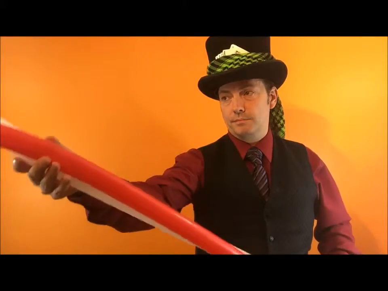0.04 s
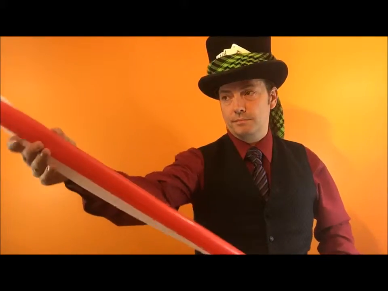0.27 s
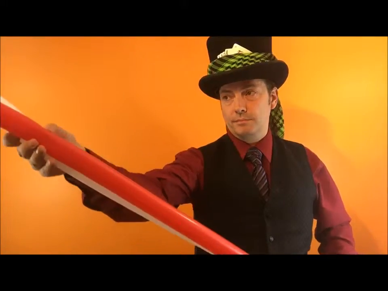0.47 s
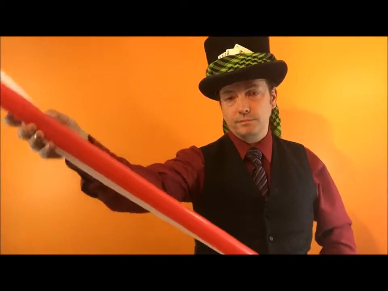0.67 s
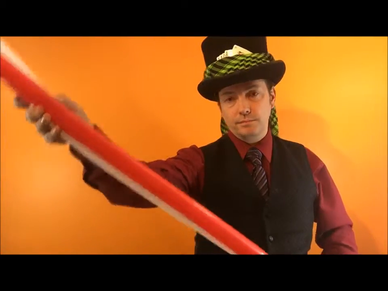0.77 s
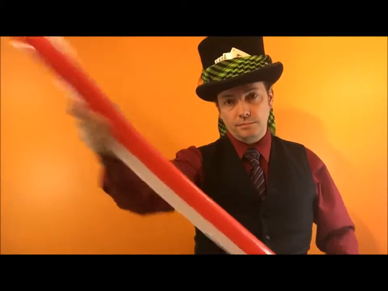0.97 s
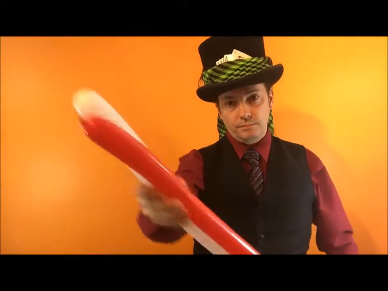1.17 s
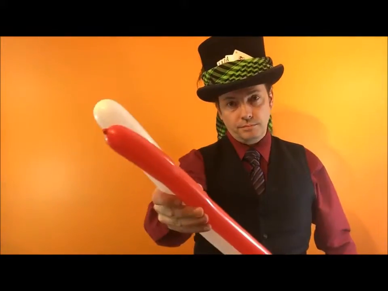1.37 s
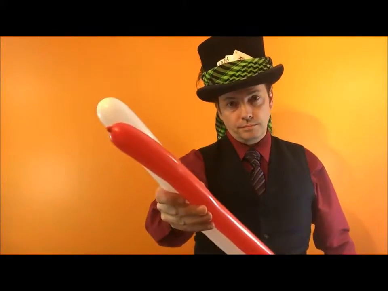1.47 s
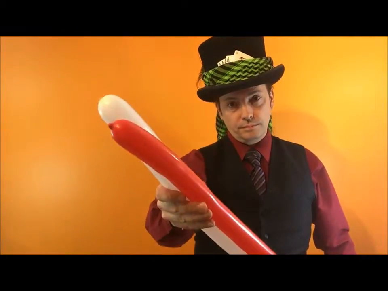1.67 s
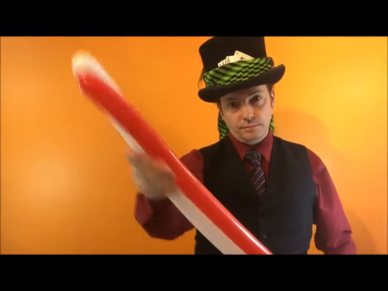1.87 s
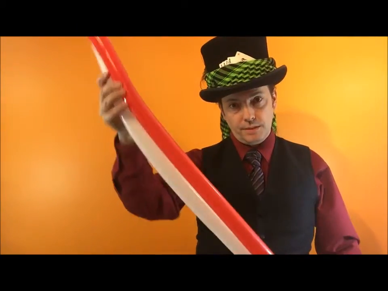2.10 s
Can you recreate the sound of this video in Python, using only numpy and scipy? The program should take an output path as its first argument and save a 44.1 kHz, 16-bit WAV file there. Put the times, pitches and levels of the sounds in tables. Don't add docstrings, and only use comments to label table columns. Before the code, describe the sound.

Hand rubbing inflated latex balloons, scratchy squeaks and creaks, then a pause and faint crackles

```python
import sys
import numpy as np
from scipy import signal
from scipy.fft import rfft, irfft, next_fast_len
from scipy.io import wavfile
from scipy.ndimage import map_coordinates

SR = 44100
rng = np.random.default_rng(int(sys.argv[2]) if len(sys.argv) > 2 else 0)


def put_to_file(sound):
    columns = np.atleast_2d(sound).T
    safe = np.clip(columns, -1, 1)
    whole_steps = np.round(safe * 32767)
    wavfile.write(sys.argv[1], SR, whole_steps.astype(np.int16))


def to_linear_factor(level_db):
    exponent = np.asarray(level_db, float) / 20
    return 10 ** exponent


N = 94329


def unit(x):
    return x / np.sqrt(np.mean(x ** 2) + 1e-20)


def along(points, hz):
    f, v = np.transpose(points)
    return np.interp(np.log(hz + 1), np.log(f + 1), v)


def curves(rows):
    s, *columns = np.transpose(rows)
    return [np.interp(np.arange(N) / SR, s, column) for column in columns]


def wobble(rate):
    knots = rng.standard_normal(int(N * rate / SR) + 4)
    return map_coordinates(knots, [np.arange(N) * rate / SR])


def coloured(x, points):
    size = 2 ** 12
    level_db = np.maximum(along(points, np.fft.rfftfreq(size, 1 / SR)), -70)
    cepstrum = irfft(np.log(to_linear_factor(level_db)), size)
    cepstrum[1:size // 2] *= 2
    cepstrum[size // 2 + 1:] = 0
    response = irfft(np.exp(rfft(cepstrum)), size)
    return signal.fftconvolve(x, response)[:len(x)]


def narrow(x, hz, width_hz):
    return unit(signal.lfilter(*signal.iirpeak(hz, hz / width_hz, SR), x))


def ringing(x, hz, ring_db, overtone_db):
    rise_s, width, overtone = 0.00025, 0.3, 1.458
    t = np.arange(SR // 100) / SR
    envelope = (1 - np.exp(-(t / rise_s) ** 2)) * np.exp(-np.pi * width * hz * t)
    modes = np.sin(2 * np.pi * hz * t) + to_linear_factor(overtone_db) * np.sin(2 * np.pi * overtone * hz * t)
    ring = envelope * modes
    ring = ring / np.abs(rfft(ring)).max()
    return x + to_linear_factor(ring_db) * signal.fftconvolve(x, ring)[:len(x)]


# (frequency [Hz], level [dB])
SKIN_COLOUR = [(400, -30.5), (750, -8.5), (1100, -0.5), (1450, -3.5), (1950, 0), (3600, -1.5), (4500, -5),
               (6500, -64.5)]


def skin_sound(x):
    return coloured(x, SKIN_COLOUR)


# (frequency [Hz], level [dB])
TICK_COLOUR = [(3500, -17.5), (5300, -0.5), (7000, -2.5), (10300, -13.5), (11500, -7.5), (15200, -12),
               (15900, -55), (16700, -67)]


def bright_edge(x):
    return coloured(x, TICK_COLOUR)


def notes(rows, shape):
    out = np.zeros(N + SR)
    t = np.arange(-SR // 25, SR // 25) / SR
    for s, db, hz in rows:
        out[round(s * SR):][:len(t)] += to_linear_factor(db) * shape(t, hz) * np.cos(2 * np.pi * hz * t)
    return out[len(t) // 2:][:N]


# (frequency [Hz], level [dB])
AIR_COLOUR = [(30, -27), (120, -2.5), (400, -8.5), (700, -8.5), (2000, -14.5), (8000, -23.5), (15300, -28),
              (16000, -31)]


def air():
    air_db, hum_db, hum_hz = -71.5, -81, 123.7
    noise = unit(coloured(rng.standard_normal(N), AIR_COLOUR))
    tone = np.sqrt(2) * np.sin(2 * np.pi * hum_hz * np.arange(N) / SR)
    return to_linear_factor(air_db) * noise + to_linear_factor(hum_db + 1.7 * wobble(8.6)) * tone


# (time [s], pressure level [dB], brightness [dB])
RUB = [(.028, -57.5, -0.5), (.04, -48.5, 1.5), (.15, -53, 5.5), (.18, -42, 8), (.45, -39, -1),
       (.53, -47, 1), (.62, -43.5, -4.5), (.765, -52.5, -3.5), (.8, -44, -16), (.86, -60.5, 9.5),
       (.89, -63, 3.5), (1.03, -64.5, 7.5), (1.06, -60.5, 5.5), (1.15, -46.5, 5), (1.27, -71.5, 7),
       (1.87, -81, 14.5), (2.02, -64, 3), (2.09, -61, 7)]
PATCH_HZ = [1190, 1950, 2500, 3600]
# (pitch [Hz], width [Hz], level [dB])
TUBE = [(620, 19, -10.5), (985, 44, -7.5)]
# (time [s], level [dB])
TUBE_OPEN = [
    (.5, -8),
    (.6, -11.5),
    (.73, -11),
    (.78, -7),
    (1.0, -18),
    (1.1, -11),
]


def rub():
    grains_per_s, biggest, grain_db = 1400, 0.14, 5
    smooth_db, patch_sway_db, tube_sway_db, flutter_db = -2, 2.5, 2, 1
    fizz_db = -14
    pressure_db, bright_db = curves(RUB)

    hit, size, sign = rng.random((3, len(PATCH_HZ), N))
    happens = hit < grains_per_s / SR / len(PATCH_HZ)
    grains = happens * to_linear_factor(-grain_db * np.log(size + biggest)) * (sign - 0.5)
    drive = unit(grains) + to_linear_factor(smooth_db) * rng.standard_normal(grains.shape)
    whole_hand = drive.sum(axis=0)

    skin = sum(to_linear_factor(patch_sway_db * wobble(29.68)) * ringing(d, hz, ring_db=12, overtone_db=-4)
               for d, hz in zip(drive, PATCH_HZ))
    tube = sum(to_linear_factor(db + tube_sway_db * wobble(12.03)) * narrow(whole_hand, hz, width_hz)
               for hz, width_hz, db in TUBE)
    tube = to_linear_factor(curves(TUBE_OPEN)[0]) * tube
    fizz = unit(bright_edge(whole_hand)) * to_linear_factor(fizz_db + bright_db)
    return to_linear_factor(pressure_db + flutter_db * wobble(41.14)) * (unit(skin_sound(skin)) + tube + fizz)


# (time [s], level [dB])
THUD = [(.03, -65), (.11, -56), (.15, -55.5), (.3, -46.5), (.4, -52.5), (.445, -51), (.47, -60), (.6, -68),
        (.65, -69), (.93, -68), (.97, -63), (1.03, -76), (1.14, -51), (1.22, -78.5), (1.95, -72),
        (2.12, -60.5)]
# (frequency [Hz], level [dB])
THUD_COLOUR = [(15, -60), (25, -77), (65, -11.5), (291, -4), (344, -11), (390, -5.5), (700, -7.5),
               (910, -31), (1540, -120)]
# (pitch [Hz], width [Hz], level [dB])
BOOMS = [(75, 38, -4.5), (340.5, 8.6, -7.5)]


def thud():
    lump_db = 1.2
    level_db, = curves(THUD)
    booms = sum(to_linear_factor(db) * narrow(rng.standard_normal(N), hz, width_hz) for hz, width_hz, db in BOOMS)
    rumble = unit(coloured(rng.standard_normal(N), THUD_COLOUR))
    return unit((rumble + booms) * to_linear_factor(lump_db * wobble(25.64))) * to_linear_factor(level_db)


# (peak time [s], peak level [dB], pitch [Hz])
PINGS = [(.0538, -34.5, 2000), (.0818, -39.5, 1160), (.0885, -29, 2000), (.0956, -30, 1810),
         (.1081, -35, 2000), (.1138, -24.5, 2050), (.1659, -38, 2040), (.1722, -27, 1440),
         (.1838, -29, 2620), (.1895, -23, 2980), (.2108, -43, 1340), (.2492, -22, 1090), (.269, -20, 2100),
         (.2956, -23.5, 2480), (.3019, -28.5, 1370), (.3043, -26, 1970), (.3076, -17, 2080),
         (.328, -22.5, 3650), (.337, -34, 2280), (.3659, -17, 2980), (.368, -25.5, 1360),
         (.3757, -32, 2410), (.4256, -23, 3630), (.4314, -29, 1970), (.4342, -27, 1700), (.5002, -32, 1230),
         (.5105, -25.5, 4200), (.5768, -17, 2650), (.5772, -21, 3630), (.5795, -22, 2300),
         (.5856, -27, 1990), (.582, -30.5, 1020), (.9488, -29.5, 2800), (.9495, -31.5, 1190),
         (1.0633, -29.5, 2630), (1.0729, -42, 2670), (1.116, -33.5, 1190), (1.1246, -31.5, 1920),
         (1.1335, -29, 1080), (1.4775, -40, 2950), (1.4795, -47, 980), (1.7262, -52, 3300),
         (1.8957, -51, 1430), (1.8993, -49, 1650), (1.9122, -45, 1570), (1.9198, -43, 1160),
         (1.9395, -45, 1430), (1.9487, -44.5, 1120), (2.0724, -44, 1630), (2.1015, -43, 1190),
         (2.128, -43, 1470), (2.0906, -41.5, 1510), (2.0874, -46, 1530)]


def pings():
    rise_s, cycles = 0.00033, 1.7

    def shape(t, hz):
        rise = np.exp(-(t / rise_s) ** 2 / 2)
        fall = np.exp(-np.abs(t) * hz / cycles)
        return np.where(t < 0, rise, fall)

    return notes(PINGS, shape)


# (middle time [s], peak level [dB], pitch [Hz])
THUMPS = [(.117, -47, 197), (.139, -48, 88), (.177, -44.5, 360), (.187, -46.5, 84), (.209, -52, 176),
          (.261, -41.5, 343), (.263, -61, 88), (.255, -51, 620), (.301, -42.5, 630), (.308, -46, 204),
          (.316, -43, 79), (.345, -38.5, 69.6), (.349, -41.5, 150), (.381, -46.5, 157), (.427, -53.5, 600),
          (.441, -54, 350), (.445, -39, 78), (.598, -56.5, 80), (.605, -44, 970), (.64, -65, 985),
          (.672, -52, 980), (.712, -58, 920), (.803, -60, 990), (.683, -51.5, 600), (.713, -51, 628),
          (.954, -52, 613), (1.091, -57, 75), (1.137, -47.5, 233), (1.145, -49, 68)]


def thumps():
    length_s = 0.027
    return notes(THUMPS, lambda t, hz: np.cos(np.pi * np.clip(t / length_s, -0.5, 0.5)) ** 2)


def slip(hz, after_db, ring_db):
    lead_s, lead_db = 0.002, -16
    after_t60_s, spread, overtone_db = 0.028, 0.35, -6
    tick_t60_s, tick_after_db = 0.0045, -3
    tick_hz, edge_hz = 5100, 8300
    t = np.arange(SR // 12) / SR - lead_s
    start = np.argmax(t >= 0)
    train = np.zeros(len(t))
    train[[0, start]] = to_linear_factor(lead_db), 1
    skin = ringing(train, hz, ring_db, overtone_db)

    for late, size, pitch in rng.random((12, 3)):
        after = np.zeros(len(t))
        late_s = late ** 1.5 * after_t60_s / 2 + 0.001143
        fade_db = -60 * late_s / after_t60_s / 2
        after[start + int(late_s * SR)] = (2 * size - 1) * to_linear_factor(after_db + fade_db)
        after_hz = min(hz * np.exp(spread * (2 * pitch - 1.3)), SR / 4)
        skin += ringing(after, after_hz, ring_db, overtone_db)
        train += to_linear_factor(tick_after_db) * after

    fade = to_linear_factor(-60 * np.arange(SR // 100) / SR / tick_t60_s)
    spit = np.convolve(train, rng.standard_normal(SR // 100) * fade)[:len(t)]
    tick = bright_edge(spit)
    low = signal.lfilter(*signal.butter(3, [tick_hz, edge_hz], "band", fs=SR), tick)
    high = signal.lfilter(*signal.butter(4, edge_hz, "high", fs=SR), tick)
    return [v / np.abs(v).max() for v in (skin_sound(skin), low, high)], start


# (time [s], peak level [dB], skin pitch [Hz], tick level [dB],
# thin top tick level [dB]) The main slips of the strokes, mostly strong, a few of them higher-pitched
SLIPS = [(0.1135, -22, 1810, -16.5, -20.5), (0.1647, -25, 2830, -32, -23), (0.1711, -27, 2600, -13, -25),
         (0.1814, -22.5, 2600, -18.5, -29), (0.1893, -21, 1950, -36, -18.5),
         (0.2088, -21, 1850, -42, -18.5), (0.2471, -18, 1920, -32, -29), (0.2657, -19.5, 1870, -19, -18),
         (0.2982, -18.5, 1840, -15, -12.5), (0.3253, -19, 2290, -19, -19.5),
         (0.3639, -21.5, 2130, -11, -13), (0.4067, -38, 2100, -18, -33), (0.4234, -20.5, 2700, -25, -24),
         (0.4888, -28.5, 1940, -15, -23), (0.5765, -18.5, 2050, -18, -23.5), (0.9266, -47, 2090, -20, -31),
         (0.9485, -28, 1840, -19, -44), (1.1144, -26, 2670, -8, -23), (1.1314, -27, 2640, -9, -18),
         (0.4831, -29, 2470, -21, -31),
    (0.5087, -24.5, 2380, -11.5, -16),
    (0.834, -31.5, 3330, -31, -25),
    (1.062, -25.5, 3500, -26.5, -32),
]
CREAKS = [(1.281, -51, 1860, -27, -21), (1.345, -51, 2050, -26, -22), (1.406, -48.5, 1850, -33, -13),
          (1.424, -46.5, 1600, -14.5, -20), (1.449, -47.5, 1930, -23, -15), (1.476, -38, 2100, -44, -20),
          (1.497, -51, 1970, -20, -22), (1.606, -52, 2010, -33, -17), (1.725, -49.5, 2100, -21, -18),
          (2.041, -45, 1800, -32, -14.5), (2.054, -47, 1530, -37, -31), (2.07, -51.5, 1630, -12, -11),
          (2.078, -47, 3920, -35, -8), (2.088, -38, 1600, -40, -18), (2.1, -39.5, 3600, -28, -16),
          (2.11, -52, 3140, -21, 0), (2.115, -38, 4460, -31, -15.5), (2.129, -42.5, 3950, -25, -26)]
SCRAPES = [
    (1.9084, -36.5, 1610, -28.5, -35),
    (1.918, -40, 1800, -22, -32),
    (1.936, -44.5, 1900, -21, -25),
    (1.9503, -41, 1430, -30, -23),
]
# (time [s], peak level [dB], skin pitch [Hz])
TICKS = [(0.6942, -36.5, 1950), (0.7049, -37, 2050), (0.7115, -38, 1730), (0.7246, -46, 1950),
         (0.7536, -37, 2320), (0.758, -37, 2000), (0.7618, -34, 2150), (0.7635, -38, 2120),
         (0.7681, -31, 2720), (0.7749, -33, 2820), (0.78, -38, 2600), (0.783, -34, 2240)]
# (start time [s], length [s], rate [slips/s], peak level [dB], skin pitch [Hz])
CHATTER = [
    (.79, .03, 370, -35, 2200),
    (.82, .046, 300, -40, 2000),
    (1.892, .014, 700, -54, 1300),
]


def slips():
    snap_s, tick_boost_db = 0.0007, 8
    dry_end = (-24, -34, -24, 6)  # tick, top tick, after-slips, ring [dB]
    rows = [(*row, -8, 13) for row in SLIPS]
    rows += [(*row, -2, 7) for row in CREAKS]
    rows += [(*row, 0, 26) for row in SCRAPES]
    rows += [(*row, *dry_end) for row in TICKS]
    for s, length, rate, db, hz in CHATTER:
        for k, (jitter, gain_db, pitch) in enumerate(rng.standard_normal((50, 3))):
            when = s + (k + 0.13 * jitter) / rate
            if when < s + length:
                rows.append((when, db + gain_db, hz * np.exp(0.19 * pitch), *dry_end))

    out = np.zeros(N + SR)
    for s, db, hz, low_db, high_db, after_db, ring_db in rows:
        (skin, low, high), start = slip(hz, after_db, ring_db)
        ticks = to_linear_factor(low_db + tick_boost_db) * low + to_linear_factor(high_db + tick_boost_db) * high
        out[round((s + snap_s) * SR) - start:][:len(skin)] += to_linear_factor(db) * (skin + ticks)
    return out[:N]


# (frequency [Hz], time to fall 60 dB [s])
ROOM = [(200, 0.17), (2000, 0.13), (10000, 0.037)]


def room(x):
    wall_s = 0.005
    out = np.zeros(N + 2 * SR)
    step = SR // 20
    for k in range(0, N, step):
        hz, t, z = signal.stft(rng.standard_normal(SR // 2), SR, nperseg=256)
        fade = to_linear_factor(-60 * t / along(ROOM, hz)[:, None])
        tail = signal.istft(z * fade, SR, nperseg=256)[1]
        wet = signal.fftconvolve(x[k:k + step], tail / np.linalg.norm(tail))
        out[k + int(wall_s * SR):][:len(wet)] += wet
    return out[:N]


def scene():
    room_db = -12.5
    latex = slips() + pings() + rub()
    return (latex + to_linear_factor(room_db) * room(latex) + thud() + thumps() + air())[None]


def roll_off(x):
    return signal.sosfilt(signal.butter(12, 16790, fs=SR, output="sos"), x)


def record(dry):
    low_hz, top_hz = 52, 16750
    size = next_fast_len(N)
    hz = np.fft.rfftfreq(size, 1 / SR)
    low_cut = hz ** 4 / np.hypot(hz ** 4, low_hz ** 4)
    kept = irfft(rfft(dry, size) * (hz < top_hz) * low_cut, size)[:, :N]
    return roll_off(kept)


dry = scene()
out = record(dry)
put_to_file(out)
```